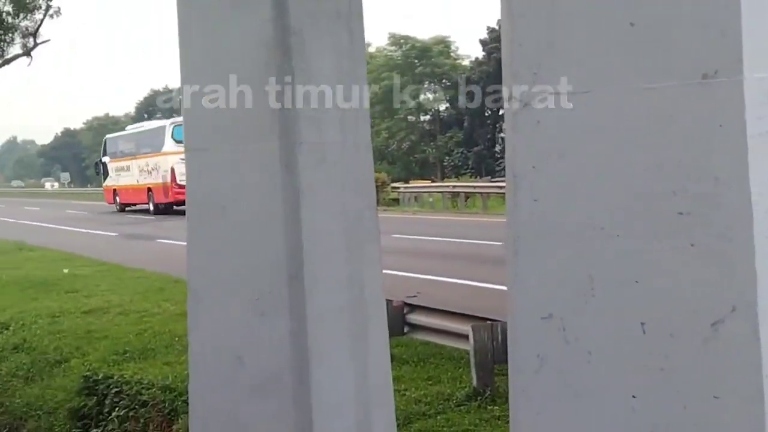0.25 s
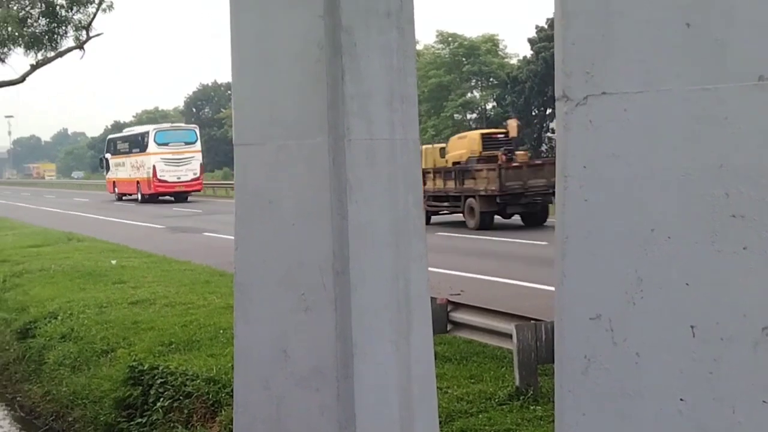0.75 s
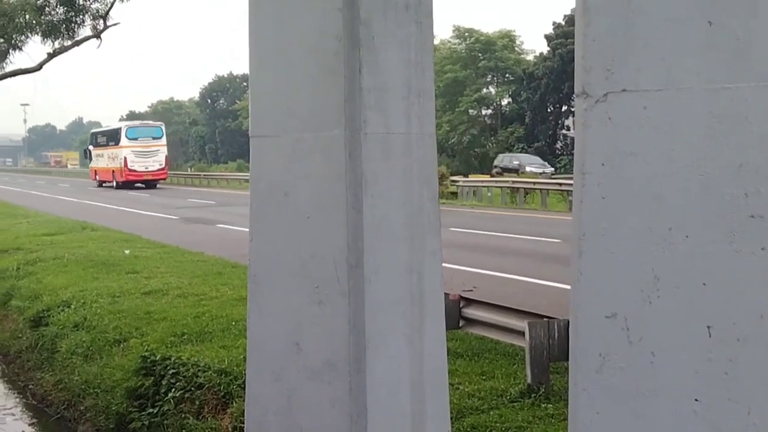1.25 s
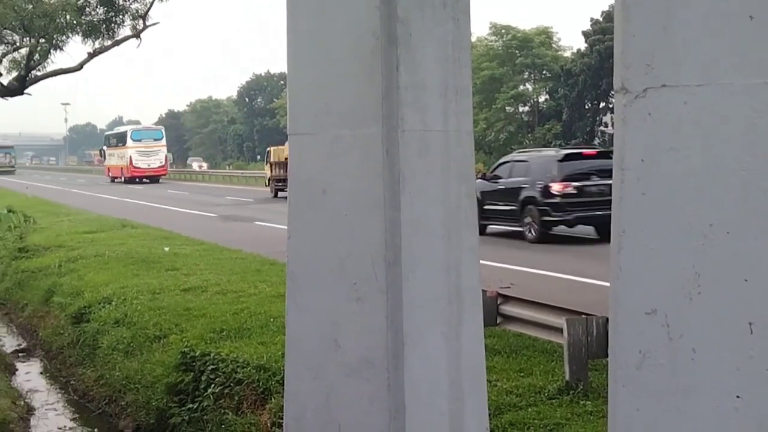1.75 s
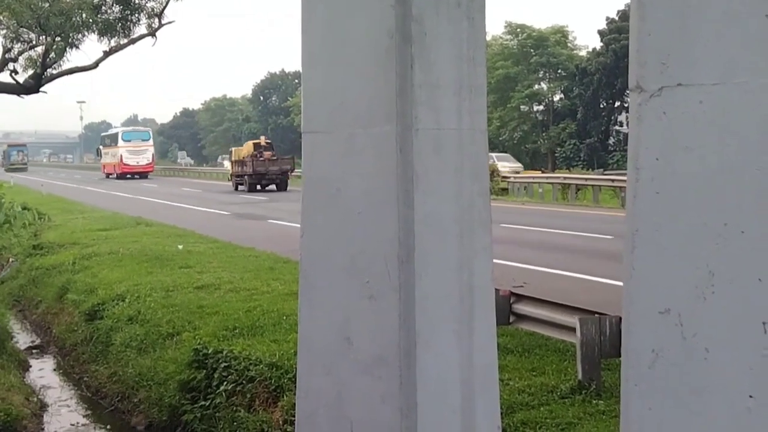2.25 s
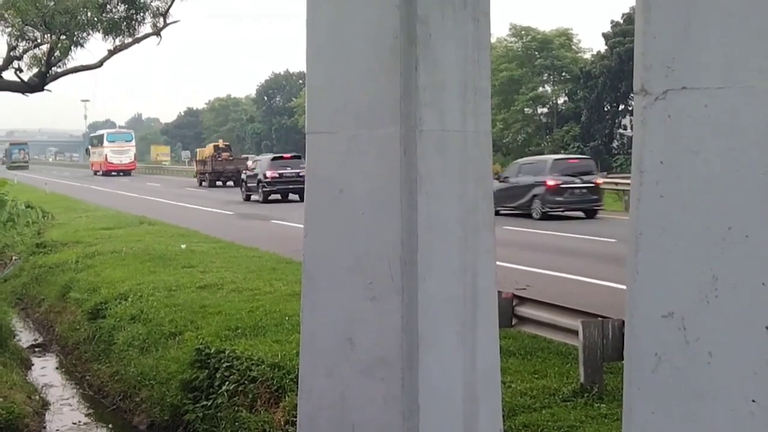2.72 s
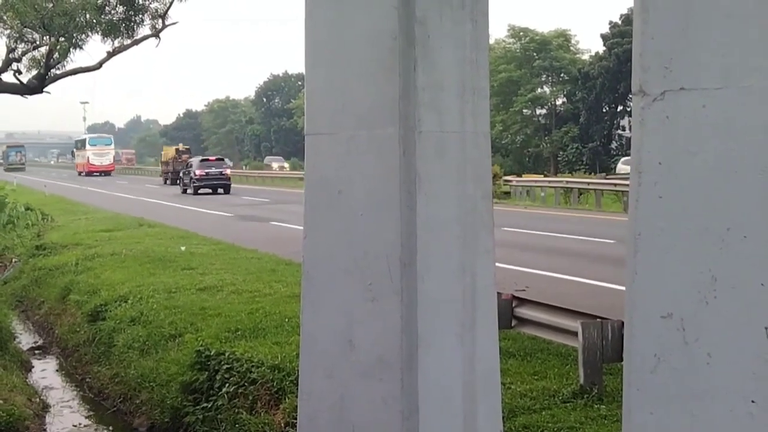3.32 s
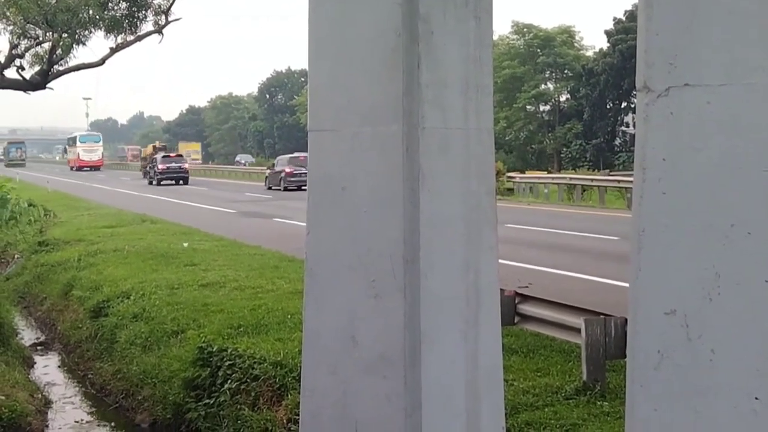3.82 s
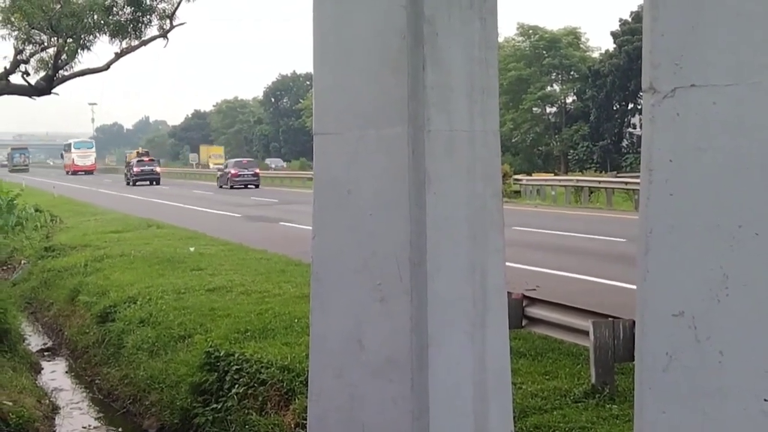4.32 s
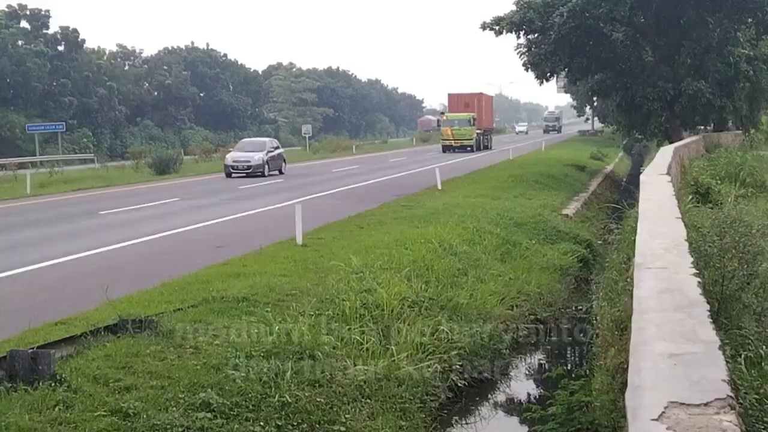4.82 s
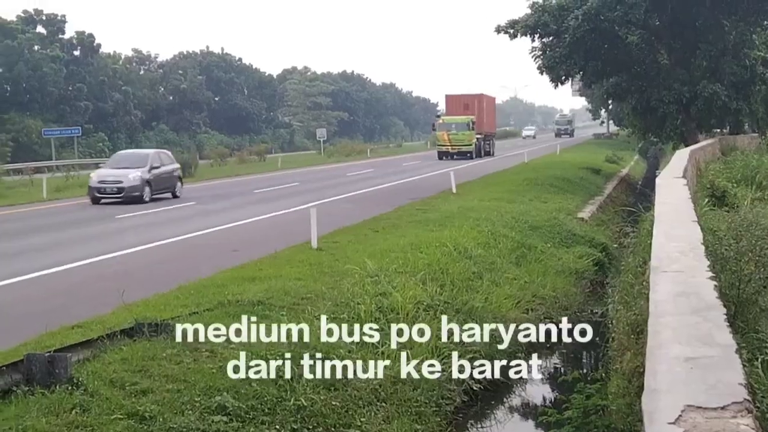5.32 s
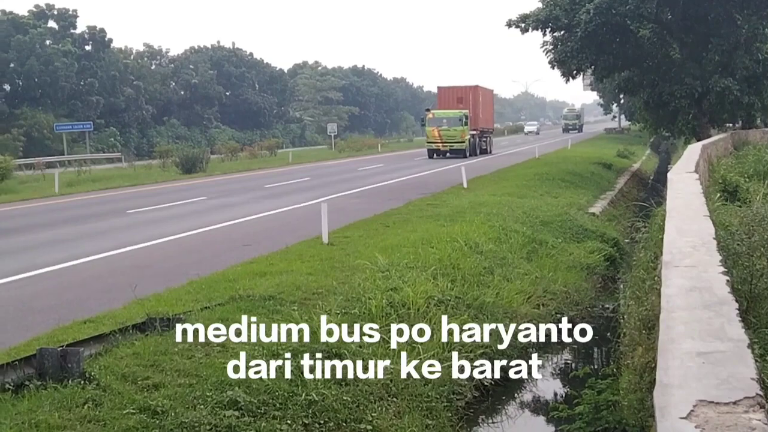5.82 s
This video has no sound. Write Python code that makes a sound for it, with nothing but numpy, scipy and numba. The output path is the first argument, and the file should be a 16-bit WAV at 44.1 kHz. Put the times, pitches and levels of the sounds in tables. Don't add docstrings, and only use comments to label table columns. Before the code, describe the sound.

Vehicles rush past a fast road in quick succession, roaring and whining, then recede; brief silence, then a fade-in to another car swishing nearer.

```python
import sys
import numpy as np
from scipy import signal
from scipy.fft import rfft, irfft, next_fast_len
from scipy.io import wavfile
from scipy.ndimage import uniform_filter1d
from numba import njit

SR = 44100
rng = np.random.default_rng(int(sys.argv[2]) if len(sys.argv) > 2 else 0)


def linear_from_db(decibels):
    return 10 ** (np.asarray(decibels, float) / 20)


def log_audio(samples):
    frames = np.atleast_2d(samples).T
    limited = np.clip(frames, -1, 1)
    pcm = np.round(limited * 32767).astype(np.int16)
    wavfile.write(sys.argv[1], SR, pcm)


N = 267687

# (low edge [Hz], high edge [Hz])
BANDS_HZ = [(40, 350), (500, 2200), (2600, 6000), (6300, 8200)]
# (frequency [Hz], level [dB per Hz])
POSTS_COLOUR = [(15, -60), (25, -22.5), (100, -4), (190, -4.5), (300, -4), (450, -5), (755, 0.5),
                (1360, 2.5), (3130, -14), (4940, -22), (6120, -29), (8100, -32), (9900, -38.5),
                (12300, -43), (15200, -44.5)]
VERGE_COLOUR = [(18, -70), (60, -22.5), (144, -23.5), (300, -26), (480, -25.5), (900, -18), (2300, -14.5),
                (3300, -23), (4200, -35.5), (5600, -37), (6300, -39), (7400, -47), (9500, -47),
                (15000, -66)]
# (frequency [Hz], width [Hz], lift [dB])
POSTS_RINGS = [(188.4, 40, 2.5), (1084, 70, -1.5), (4680, 170, 1.5), (6400, 370, -2.5), (7650, 210, 2)]
VERGE_RINGS = [(1353, 110, 4.2), (1690, 160, 2.2), (5530, 680, 0.99)]
# (lag [ms], share [1], dulled above [Hz])
POSTS_GROUND = (1.95, 0.074, 670)
VERGE_GROUND = (1.87, 0.25, 2400)
# (frequency [Hz], level [dB per line])
FAINT_TREBLE = [(3000, -92), (5000, -85), (7000, -85.5), (9300, -81.5), (10500, -85.5), (12000, -92),
                (15000, -97)]
# (time nearest [s], distance over speed [s], engine [dB], tyre roar [dB], hiss [dB])
POSTS_PASSES = [
    (.03, 0.28, -29.5, -28, -36),
    (.25, 0.17, -34, -29.5, -42),
    (.67, 0.22, -43, -27, -46.5),
    (1.01, 0.24, -35.5, -28.5, -43),
    (1.4, 0.28, -34, -26.5, -38),
    (1.9, 0.11, -36.5, -38, -45.5),
    (2.16, 0.3, -39, -29.5, -42),
    (2.44, 0.12, -47, -35.5, -52.5),
    (3.13, 0.53, -42, -35, -46),
    (4.5, 0.091, -44.5, -48, -58),
]
VERGE_PASSES = [
    (5.68, 0.064, -49.5, -29.5, -51),
    (5.99, 0.26, -42, -27, -43),
]
# (time loudest [s], pitch [Hz], width [Hz],
# level [dB], swell [s])
NEAR_TREADS = [
    (.2, 532, 250, -31.5, 0.49),
    (0.63, 1460, 260, -25.5, .16),
    (.8, 2070, 251, -34, 0.14),
    (1.7, 210, 49, -38, 0.17),
    (.45, 185, 45, -36, 0.046),
]
CLOSE_TREADS = [
    (.82, 1023, 210, -30.5, .13),
]
AXIAL_TREADS = [(0.45, 880, 130, -34, 0.13), (1.33, 1320, 290, -34.5, 0.15), (.06, 2150, 600, -38.5, .15),
                (1.7, 885, 140, -30, 0.28), (1.65, 4480, 87, -47, 0.55), (2.44, 1366, 140, -34, .16),
                (1.15, 780, 160, -33.5, 0.15), (1.15, 2100, 230, -37.5, .1), (1.48, 1870, 120, -39, .08),
                (1.5, 1450, 120, -35, 0.059), (2.33, 2300, 430, -39.5, .12), (1.7, 4820, 100, -50.5, 0.41),
                (5.95, 870, 120, -36.5, 0.27), (3.1, 4550, 220, -53, .8), (4.3, 4640, 410, -54, 0.55),
                (4.5, 1605, 360, -41.5, 0.36), (5.33, 1600, 88.6, -41.5, .12), (5.68, 1840, 90, -34, 0.12),
                (5.92, 1880, 100, -34.5, 0.16), (5.72, 1350, 120, -30, 0.14), (6., 1370, 90, -30, .14),
                (4.04, 1500, 83, -42.5, .08), (0.22, 3700, 1300, -40.5, 0.097),
                (.22, 1430, 190, -30.5, 0.17), (2.04, 760, 120, -33.5, 0.14),
                (0.39, 1690, 130, -31.5, 0.084), (.35, 1340, 110, -33, 0.071), (.78, 930, 110, -33.5, .1),
                (1.82, 1480, 150, -37, .1), (2.15, 1330, 100, -30.5, .15), (.55, 2300, 500, -38, .22),
                (3.3, 2150, 420, -42.5, .3), (1.42, 1150, 90, -35, 0.051)]
AIR_RUSH = [
    (.62, 12300, 2200, -65, .22),
    (1.85, 11000, 1800, -65.5, .25),
    (1.1, 12600, 2500, -60, .25),
    (1.8, 14000, 2500, -64, .3),
    (2.2, 9400, 1200, -57, 0.22),
    (2.3, 11960, 1500, -68, .2),
    (4.5, 5500, 900, -62.5, 0.33),
    (1.8, 10200, 1200, -68.5, .15),
    (5.88, 8240, 700, -73, .12),
]
DRONES = [
    (2.55, 195, 49.6, -44.5, 0.1),
    (2.78, 140, 40, -44.5, .08),
    (3.3, 170, 50.3, -43.5, .3),
    (3.45, 95.4, 40, -45, 0.089),
    (4.25, 110, 59.8, -44, .35),
    (4.4, 200, 40, -48.5, .15),
    (5.8, 260, 60, -51, .15),
    (1.9, 280, 60, -44, .2),
    (4.65, 65, 30, -49.5, .12),
    (1.3, 330, 54, -40.5, 0.11),
]
# (time [s], pitch [Hz], peak [dB], length [s])
THROBS = [(.915, 827, -23.5, 0.015), (0.954, 720, -21, .014), (1.005, 854, -18, 0.011),
          (1.065, 760, -21.5, .013), (1.168, 760, -20.5, 0.0082), (1.2, 742, -25.5, .014),
          (0.095, 600, -28, 0.0092), (.44, 1700, -25.5, .01), (1.2, 1390, -25, 0.0072),
          (1.364, 1350, -20.5, 0.0068), (.48, 1550, -19.5, .008), (.593, 1370, -19.5, .008),
          (.663, 1460, -23, .008), (.626, 939, -25, .008), (1.4, 970, -22, 0.011), (1.3, 894, -24, 0.011),
          (1.616, 970, -25.5, 0.01), (1.7, 939, -26, 0.013), (2.1, 934, -25, .01), (.21, 1330, -24, .008),
          (.305, 1290, -25, .008), (2.258, 1340, -26, .01), (2.14, 1330, -26, .012)]

# (engine [dB], tyre roar [dB], hiss [dB], air [dB])
POSTS_FAR, VERGE_FAR = (-40.5, -36.5, -46, -57.5), (-41.5, -29.5, -43.5, -64.5)
POSTS_AIR_DB, VERGE_AIR_DB = -8.5, -15
NEAR_DROP, AXIAL_DROP, CLOSE_DROP = 0.077, 0.027, .2
CUT_S, RESUME_S = 4.8165, 5.0605
FADE_S = .225


def walk(rate):
    hold = max(int(SR / rate), 1)
    steps = rng.standard_normal(N // 100)[:N // hold + 1]
    held = np.repeat(steps, hold)[:N]
    return 4 / 3 * uniform_filter1d(uniform_filter1d(held, hold), hold)


def knock():
    start_s, hz, t60_s, peak_db = 5.2859, 360, .008, -14.5
    t = np.clip(np.arange(N) / SR - start_s, 0, None)
    return -linear_from_db(peak_db) * np.sin(2 * np.pi * hz * t) * np.exp(-np.log(1000) * t / t60_s)


@njit
def svf(x, hz, width):
    y, band, low = np.empty(len(x)), 0., 0.
    for i in range(len(x)):
        g, damping = np.tan(np.pi * hz[i] / SR), width / hz[i]
        v = (band + g * (x[i] - low)) / (1 + g * (g + damping))
        band, low, y[i] = 2 * v - band, low + 2 * g * v, damping * v
    return y


def sliding_tones(rows, drop):
    patchy_db = 2
    t, out = np.arange(N) / SR, np.zeros(N)
    for loudest_s, hz, width, db, swell_s in rows:
        first = max(int((loudest_s - 6 * swell_s) * SR), 0)
        heard = slice(first, int((loudest_s + 6 * swell_s) * SR))
        along = (t[heard] - loudest_s) / swell_s
        pitch = hz * (1 - drop * along / np.sqrt(1 + along ** 2))
        noise = rng.standard_normal(N)[heard]
        tone = svf(svf(noise, pitch, 1.5 * width), pitch, 1.5 * width)
        even = tone / np.sqrt(uniform_filter1d(tone ** 2, size=SR // 14) + 1e-12)
        out[heard] += linear_from_db(db + patchy_db * walk(25)[heard]) * even / (1 + along ** 4)
    return out


def worn_tyre():
    t, out = np.arange(N) / SR, np.zeros(N)
    for s, hz, db, length_s in THROBS:
        burst = np.exp(-((t - s) / length_s) ** 2)
        out += linear_from_db(db) * burst * np.sin(2 * np.pi * hz * (t - s))
    return out


def traffic(passes, far, air_db):
    falloff = np.array((.96, 1.009, 1.16, 1.7))[:, None]
    air_loss_db_s = 5
    t, power = np.arange(N) / SR, linear_from_db(np.array(far))[:, None] ** 2
    for nearest_s, pass_s, engine_db, roar_db, hiss_db in passes:
        distance_squared = 1 + ((t - nearest_s) / pass_s) ** 2
        vehicle_air_db = hiss_db + air_db - air_loss_db_s * pass_s
        nearest = linear_from_db(np.array([engine_db, roar_db, hiss_db, vehicle_air_db]))[:, None] ** 2
        power = power + nearest / distance_squared ** falloff
    return 10 * np.log10(power)


def viewpoint(f, colour, rings, ground):
    hz, db = np.transpose(colour)
    db = np.interp(np.log(f + 1), np.log(hz), db)
    for ring_hz, width, lift_db in rings:
        db = db + lift_db * np.exp(-.5 * ((f - ring_hz) / width) ** 2)
    lag_ms, share, dull_hz = ground
    reflection = share * np.exp(-2j * np.pi * f * lag_ms / 1000) / np.sqrt(1 + (f / dull_hz) ** 4)
    return linear_from_db(db) * (1 - reflection)


def road_roar(levels, colour, rings, ground, air_swing):
    shared_db, flicker_db = 0.55, 0.92
    hollow_hz, hollow_octaves, hollow_share = 412, .55, 0.27
    size = next_fast_len(N)
    f = np.fft.rfftfreq(size, 1 / SR)
    spectrum = rfft(rng.standard_normal(size)) * viewpoint(f, colour, rings, ground)
    power = np.abs(spectrum) ** 2 * 2 / size ** 2
    gains = []
    for db, (lo, hi) in zip(levels, BANDS_HZ):
        gains.append(db - 10 * np.log10(power[(f > lo) & (f < hi)].sum()))
    air = gains[-1]
    for steps in (1, 2):
        gains.append(air + steps * air_swing * (air - air.max()))
    centres = np.log2([np.sqrt(lo * hi) for lo, hi in BANDS_HZ] + [11000, 15000])
    out, shared = np.zeros(N), walk(12)
    far_db = levels[1].max() - levels[1]
    for octave in np.arange(4, 14.4, 1 / 3):
        place = np.interp(octave, centres, np.arange(len(gains)))
        k = min(int(place), len(gains) - 2)
        db = gains[k] + (place - k) * (gains[k + 1] - gains[k])
        db = db + shared_db * shared + flicker_db * walk(11)
        hollow = np.exp(-((octave - np.log2(hollow_hz)) / hollow_octaves) ** 2)
        db = db - hollow_share * far_db * hollow
        slot = np.clip(1 - 3 * np.abs(np.log2(f + 1) - octave), 0, 1)
        out += linear_from_db(db) * irfft(spectrum * slot, size)[:N]
    return out


def scene():
    t = np.arange(N) / SR
    drones = sliding_tones(DRONES, AXIAL_DROP)
    air_rush = sliding_tones(AIR_RUSH, 0)
    treads = sliding_tones(AXIAL_TREADS, AXIAL_DROP) + sliding_tones(NEAR_TREADS, NEAR_DROP)
    treads = treads + sliding_tones(CLOSE_TREADS, CLOSE_DROP)
    posts_levels = traffic(POSTS_PASSES, POSTS_FAR, POSTS_AIR_DB)
    verge_levels = traffic(VERGE_PASSES, VERGE_FAR, VERGE_AIR_DB)
    posts = road_roar(posts_levels, POSTS_COLOUR, POSTS_RINGS, POSTS_GROUND, air_swing=0.75)
    verge = road_roar(verge_levels, VERGE_COLOUR, VERGE_RINGS, VERGE_GROUND, air_swing=0.57)
    roar = np.where(t < (CUT_S + RESUME_S) / 2, posts, verge)
    return (roar + drones + air_rush + treads + worn_tyre() + knock())[None]


def thin_faint_treble(dry):
    mask_share, mask_ref_db = 0.21, -30
    soft_db, left_db = 1., -29
    fade_dull_db = 5
    f, frames, z = signal.stft(dry, SR, nperseg=2048, noverlap=1536)
    patch = uniform_filter1d(uniform_filter1d(np.abs(z) ** 2, size=4, axis=1), size=7, axis=2)
    loudness_db = 10 * np.log10(patch.sum(axis=1, keepdims=True) + 1e-9)
    fading = (frames > CUT_S + FADE_S / 2) * np.clip(1 - (frames - RESUME_S) / FADE_S, 0, 1)
    masking_db = mask_share * (loudness_db - mask_ref_db) + fade_dull_db * fading
    hz, db = np.transpose(FAINT_TREBLE)
    threshold_db = np.interp(f, hz, db, left=-200)[:, None] + masking_db
    above = (10 * np.log10(patch + 1e-14) - threshold_db) / soft_db
    kept = linear_from_db(left_db / (1 + np.exp(np.clip(above, -30, 30))))
    return signal.istft(z * kept, SR, nperseg=2048, noverlap=1536)[1][:, :N]


def scene_change():
    snip_s, edge_s, fade_start = .0004, .002, .06
    t = np.arange(N) / SR
    fade = np.clip(fade_start + (1 - fade_start) * (t - RESUME_S) / FADE_S, 0, 1)
    posts_gate = np.clip((CUT_S - t) / snip_s, 0, 1)
    return posts_gate + fade * np.clip((t - RESUME_S) / edge_s, 0, 1)


def low_pass(x):
    return signal.sosfilt(signal.butter(12, 15400, fs=SR, output="sos"), x)


def record(dry):
    hiss = linear_from_db(-90) * rng.standard_normal(N)
    mix = (thin_faint_treble(dry) + hiss) * scene_change()
    return low_pass(mix)


dry = scene()
out = record(dry)
log_audio(out)
```